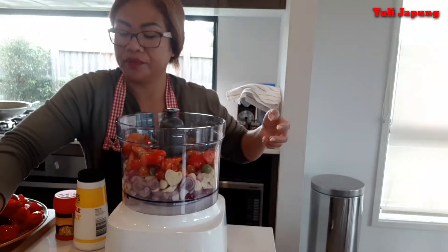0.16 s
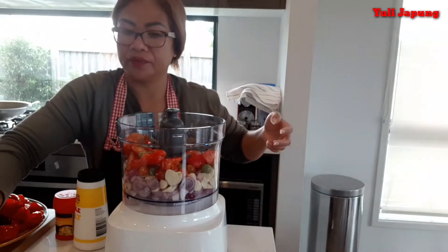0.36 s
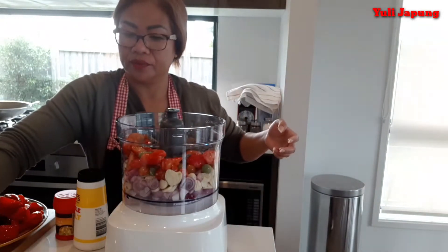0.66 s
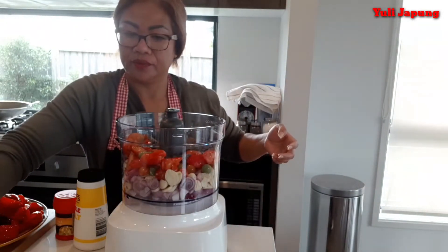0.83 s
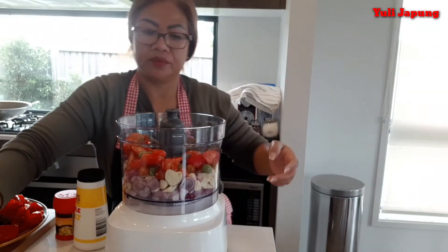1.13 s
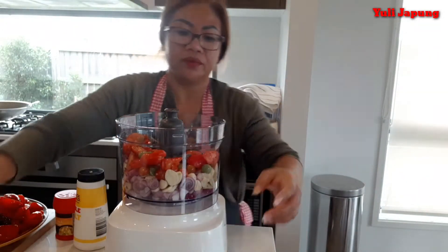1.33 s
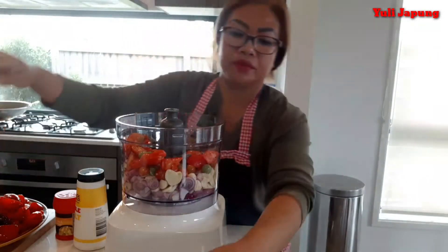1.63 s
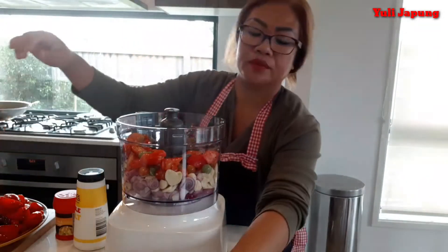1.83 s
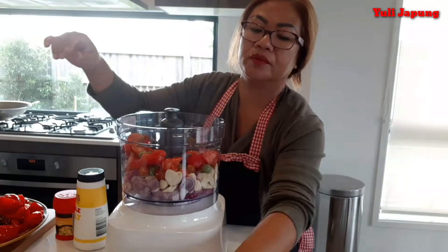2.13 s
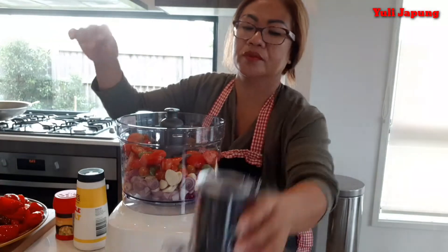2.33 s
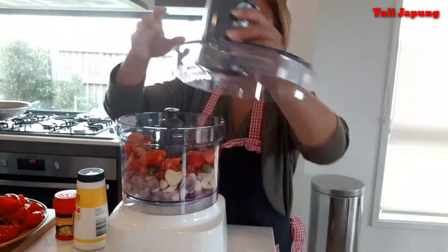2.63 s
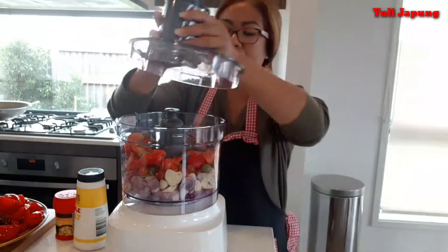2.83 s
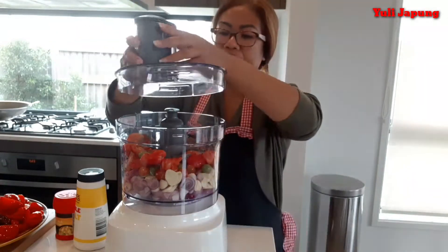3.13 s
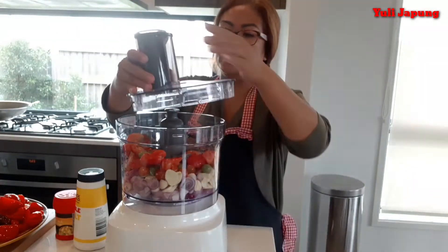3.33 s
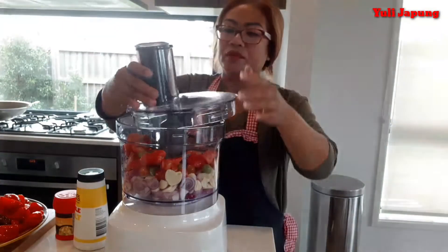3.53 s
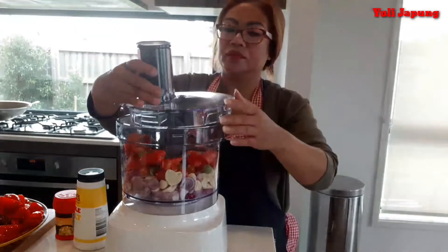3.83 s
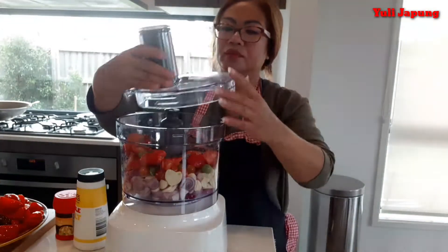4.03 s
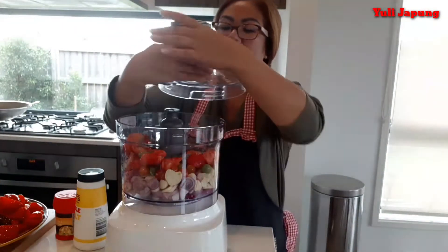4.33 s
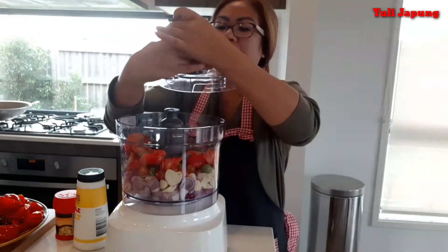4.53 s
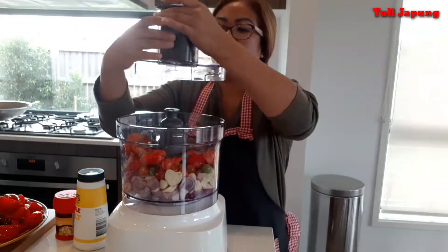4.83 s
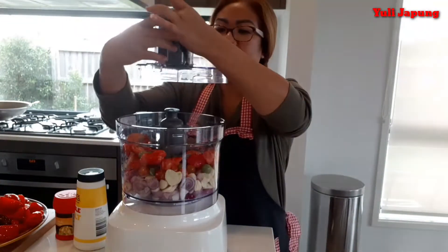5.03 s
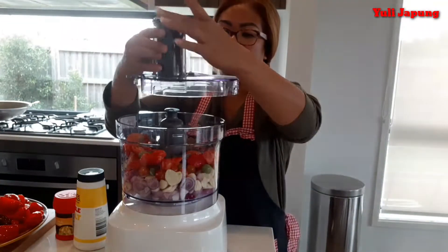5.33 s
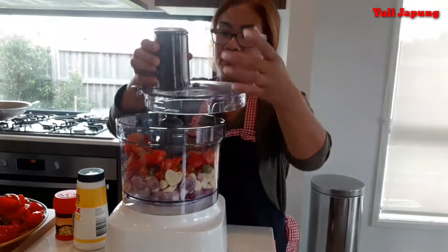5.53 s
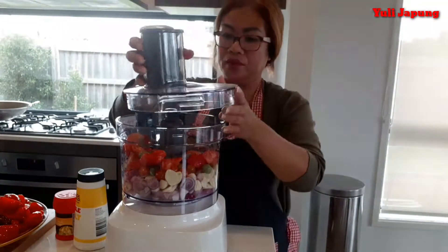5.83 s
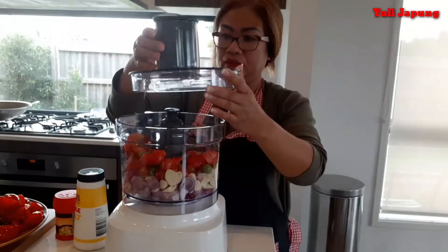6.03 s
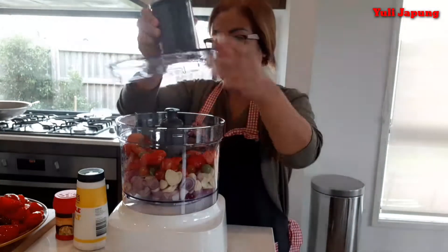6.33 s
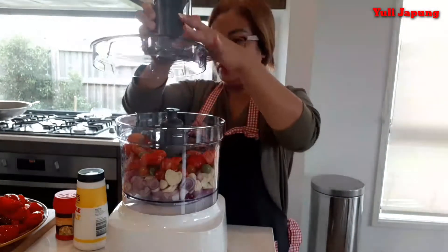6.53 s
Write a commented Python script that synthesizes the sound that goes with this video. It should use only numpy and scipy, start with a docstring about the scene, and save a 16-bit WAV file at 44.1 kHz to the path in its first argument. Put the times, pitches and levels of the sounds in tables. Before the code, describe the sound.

In a home kitchen, crockery clatters, then a plate is set down with two ringing clinks and rocks, ticking faster and fainter. A plastic food processor lid drags softly off the counter and knocks twice against the bowl. Its pusher then taps and rubs hollowly in the feed tube as the lid is turned about. The stereo microphones are close, with some room reverberation and a faint hiss.

```python
"""A home kitchen. Crockery clatters; a plate is set down with two clinks and rocks on its foot ever faster.
A plastic food processor lid is dragged off the counter and knocked onto the bowl, then its pusher
rubs and taps in the hollow feed tube as the lid is turned about. Each impact gives a broadband crack
and excites damped normal modes; sliding friction gives rough noise, which also drives the air in the tube.
Two spaced microphones receive the direct sound, the reverberation and a faint background hiss."""
import sys
import numpy as np
from scipy import signal
from scipy.fft import rfft, irfft, next_fast_len
from scipy.io import wavfile
from scipy.ndimage import uniform_filter1d

SR = 44100
rng = np.random.default_rng(int(sys.argv[2]) if len(sys.argv) > 2 else 0)


def store_wav(level_fs):
    """Save 16-bit WAV to argv[1]."""
    pcm = np.round(np.clip(np.atleast_2d(level_fs), -1, 1) * 32767)
    wavfile.write(sys.argv[1], SR, pcm.T.astype(np.int16))


N = 294588
TIME = np.arange(N) / SR
MIC_SPACING_M, SOUND_SPEED_M_PER_S, CUTOFF_HZ = .11, 343, 15800

# Levels in the tables are relative: each source applies its own gain.
# steady background: (frequency [Hz], spectral density [dB])
AIR_SPECTRUM = [(25, -9.5), (50, -7), (120, -3.5), (200, -8.5), (333, -11), (600, -18.5), (1100, -21),
                (2000, -25.5), (4000, -28), (7000, -27.5), (10000, -28), (15800, -28)]
# the hiss dips after the loud clatter, then swells back as the recorder's automatic gain recovers:
# (time [s], level [dB])
HISS_GAIN = [(0, -68.5), (.7, -71.5), (1.2, -65), (3.4, -65.5), (6.68, -62.5)]
# reverberation of the kitchen: (frequency [Hz], t60 [s])
KITCHEN_T60 = [(120, 0.48), (500, 0.54), (1200, 0.57), (4000, 0.49), (8000, 0.57), (15000, 0.24)]

# impacts: (time [s], level [dB], crack offset [dB], crack tilt [dB/octave])
DISH_IMPACTS = [(0, -8.5, 1, -1), (.018, -15, -5, -0.5), (.05, -16, -10.5, -1), (.140, -18, 3, 1.5),
                (.158, -30, 4.5, -4.5)]
COUNTER_IMPACTS = [(2.052, -27, 0, 0), (2.088, -27, 0, 0), (2.097, -23.5, 0, 0)]
BOWL_IMPACTS = [(3.571, -10, 2, 0), (3.592, -15, -1, 0.5), (3.742, -19.5, 0, -3.5)]
# the plate's clinks and their quick echoes off wall or ceiling, 8 and 23 ms later:
# (time [s], level [dB], crack offset [dB], crack tilt [dB/octave])
RIM_CLINKS_AND_ECHOES = [(.779, -18, -4.5, -0.97), (.7865, -18, 1.5, 2.1), (.8024, -24.5, 8.5, -0.37),
                         (1.0094, -40.5, -3, 0.47)]
FOOT_CLINK_AND_ECHO = [(1.1195, -8.5, 0, 0.00092), (1.1273, -19.5, 0.0048, 0)]
# the machine thumps on the counter: (time [s], level [dB])
BASE_THUMPS = [(3.578, -28), (3.749, -31.5), (1.9, -44)]
# the pusher taps the tube wall, then slides on:
# (time [s], low resonances [dB], high resonances [dB], crack [dB], slide duration [s])
TUBE_TAPS = [(2.96, -42, -69, -59, 0.052), (4.413, -45.5, -36.5, -57, 0.027),
             (4.479, -32, -37.5, -41, 0.0077), (4.503, -42, -36.5, -44.5, 0.023),
             (5.190, -46.5, -41.5, -58, 0.019), (5.233, -33, -42.5, -52.5, 0.026),
             (5.524, -47.5, -62, -67, 0.019), (5.561, -42.5, -53.5, -71, 0.055),
             (5.626, -49, -52, -80, 0.012), (5.73, -44, -52.5, -64, 0.024), (5.783, -50, -48.5, -63, 0.022),
             (5.874, -28.5, -38, -44.5, 0.025), (5.952, -40.5, -39.5, -48, 0.018),
             (6.035, -46, -34, -42, 0.0089), (6.092, -32, -38, -45.5, 0.0046),
             (6.130, -24.5, -32, -37.5, 0.0062), (6.219, -52, -68, -53.5, .005),
             (6.37, -45.5, -44, -54, 0.011), (6.559, -48.5, -55, -51, 0.031),
             (6.606, -43.5, -38, -41, 0.0049), (6.649, -47, -40.5, -47.5, 0.028)]

# normal modes of the solids and of the air in the tube: (frequency [Hz], t60 [s], level [dB])
DISH_MODES = [(1041, 0.22, -7), (1117, 0.22, -11.5), (1256, .4, -14), (1510, 0.13, -8), (1960, 0.17, -7.5),
              (2136, 0.3, -2), (3190, 0.16, -3), (4036, .22, -0.5), (4200, .25, -8.5), (5900, 0.35, -18.5),
              (6260, 0.27, -5), (7600, 0.26, -17.5), (9070, .35, -20.5), (11080, .25, -24.5)]
ROCKING_MODES = [(1292, 0.11, -13), (2540, 0.078, -8), (2720, 0.079, -3), (3270, 0.046, -17),
                 (3493, 0.027, 4), (4280, 0.027, -6.5), (4647, 0.034, -1.5), (5730, 0.02, -15),
                 (6340, 0.16, -17.5), (6820, 0.084, -18.5)]
LID_MODES = [(169, 0.077, -1.8), (468, 0.069, -0.22), (552, 0.056, -0.95), (692, 0.019, -0.98),
             (970, 0.053, 1), (1262, 0.078, 0.77), (2430, 0.051, 0), (3060, 0.037, -1.8)]
BOWL_MODES = [(299, 0.16, -16), (350, 0.11, -17.5), (474, 0.06, 1.5), (535, 0.048, 0.5), (778, 0.059, -16),
              (854, 0.057, -11.5), (1015, 0.1, -17), (1837, 0.025, -6.5), (3190, 0.015, -4),
              (3780, 0.051, -22)]
BASE_MODES = [(146.4, 0.1, 3.5), (175, 0.091, -8.5)]
TUBE_LOW_MODES = [(762.2, 0.073, -2), (830, 0.049, -9)]
TUBE_HIGH_MODES = [(998, 0.027, 2), (1022.3, 0.057, 1), (1170, 0.078, -12.5), (1273, 0.04, -4.5),
                   (1604, 0.038, -15.5), (2331, 0.033, -15.5), (3050, 0.038, -24.5), (4000, 0.038, -27.5),
                   (6740, 0.054, -22.5)]
# modes of the plate: (frequency [Hz], t60 [s], level struck at the rim [dB], level at the foot [dB])
PLATE_MODES = [(1300, 0.74, -36.5, -16), (2190, .25, -7.5, -8.5), (2440, 0.18, -3, -8.5),
               (2540, 0.42, 1.5, -8.5), (2590, 0.38, 0, -10), (2700, 0.17, -15.5, -12),
               (3190, 0.18, -44, -3.5), (3240, 0.17, -43, 3), (3470, .3, -41, -8.5), (4110, 0.22, -25, -2),
               (4300, 0.17, -1.5, -12.5), (4350, 0.13, -16.5, -4), (4410, 0.065, -29.5, 4),
               (5801, 0.29, -34, -10), (5830, 0.34, -20, -18.5), (6260, 0.2, -34.5, -10.5),
               (7270, 0.34, -22, -14.5), (7800, 0.34, -16.5, -24), (7800, 0.12, -2.5, -20),
               (8930, .28, -36.5, -16.5), (9400, 0.17, -7, -24.5), (10470, 0.3, -10, -9.5),
               (11077, 0.22, -26.5, -14), (11550, 0.26, -2, -7.5), (12950, 0.219, -45, -24.5),
               (13900, .2, -15.5, -17.5), (14050, 0.22, -30, -23), (14850, 0.18, -13.5, -22)]

# cracks, each a crowd of short-lived modes: (frequency [Hz], spectral density [dB])
DISH_SPECTRUM = [(60, -31), (150, -7), (215, -19.5), (380, -7.5), (600, -5.5), (1100, -4.5), (2400, -7.5),
                 (4200, -9.5), (4900, -18), (10000, -22.5), (15000, -27.5)]
PLATE_SPECTRUM = [(90, -26), (165, 6.5), (330, -23), (570, -2), (800, 1), (1200, 5.5), (1700, -3),
                  (2600, -2), (4400, -4.5), (6000, 2), (9000, -4), (15000, -13.5)]
COUNTER_SPECTRUM = [(90, -25), (167, -9), (370, -3), (700, -3), (1280, -3), (1710, -14.5), (2430, -6),
                    (4000, -20.5), (8000, -39), (15000, -45)]
BOWL_SPECTRUM = [(80, -15), (140, 2), (230, -26), (550, 1.5), (1100, 3.5), (2400, -2.5), (3500, 3),
                 (6000, -8), (10000, -14), (15000, -17.5)]
TUBE_SPECTRUM = [(120, -17), (330, 5), (520, 6), (1100, -4), (1800, 2.5), (2400, 4), (3600, -1),
                 (4200, 2.5), (4700, 1), (6300, 0), (8500, -18.5), (15000, -33)]

# the lid slides over the counter: (time [s], level [dB])
DRAG_ENVELOPE = [(1.6, -66), (1.7, -55), (1.75, -53), (1.83, -55), (1.92, -45.5), (2.0, -47.5), (2.13, -53),
                 (2.22, -79)]
# strokes of the scraping lid, the hands and the pusher: (start [s], duration [s], level [dB])
SCRAPE_STROKES = [(1.68, 0.1, -48.5), (2.962, 0.042, -51)]
HAND_STROKES = [(2.957, 0.057, -60.5), (5.147, 0.12, -60.5), (6.556, 0.039, -53)]
SLIDE_STROKES = [(4.413, .085, -39.5)]
# friction noise: (frequency [Hz], spectral density [dB])
DRAG_SPECTRUM = [(500, -19), (1500, -19), (3000, 0), (4500, -3), (7000, -2.5), (10000, -6.5), (13000, -18),
                 (15500, -15)]
SCRAPE_SPECTRUM = [(300, -5.5), (600, -16.5), (800, 10.5), (1250, 0), (1800, -7.5), (2300, 6), (2800, 8),
                   (3500, -38), (10000, -22)]
HAND_SPECTRUM = [(700, 0), (1800, -10.5), (2500, -8), (3500, 0.5), (4400, -5), (5400, -1), (7500, -8),
                 (10000, -13.5), (15000, -29)]
SLIDE_SPECTRUM = [(350, 2), (1200, -12), (1900, -9), (3500, 0.5), (9000, -3), (11600, 0.5), (15500, -4.5)]
SLIP_SPECTRUM = [(500, 2.5), (1300, -5.5), (2400, -2), (6000, -10.5), (12000, -24)]

ROCK_START_S, ROCK_FIRST_GAP_S, ROCK_LIMIT_GAP_S = 1.295, .04969, .02579
ROCK_GAP_KEPT = .96238   # share of its excess over the limit that a gap passes to the next
ROCK_LIMP = .04   # every other tick comes early by this share of a gap
ROCK_DB, ROCK_FADE_DB_PER_S = -38.5, 17.5
ROCK_LEAN_DB, ROCK_LEAN_DB_PER_S = 1.35, 2.5   # one side lands harder; the weight shifts to the other
SETTLE_S, SETTLE_DB_PER_S = 2.95, 12.5   # from here on the swing fades faster


def from_db(db):
    """Amplitude ratio of a level in decibels."""
    return 10 ** (np.asarray(db) / 20)


def rms_one(x):
    """Normalisation to unit mean power."""
    return x / np.sqrt(np.mean(x ** 2) + 1e-20)


def at_hz(points, hz):
    """Interpolation on a logarithmic frequency axis."""
    f, value = np.transpose(points)
    return np.interp(np.log(np.maximum(hz, 1)), np.log(f), value)


def gain_curve(rows):
    """Amplitude envelope, linear in decibels between points and silent outside its span."""
    s, db = np.transpose(rows)
    return from_db(np.interp(TIME, s, db, left=-200, right=-200))


def dying(t, t60):
    """Exponential damping: the level falls 60 dB in t60 seconds."""
    return np.exp(-np.log(1000) * t / t60)


def noise(spectrum, size, tilt_db=0):
    """Random-phase synthesis: noise of unit rms with the given spectrum, tilted by tilt_db per octave."""
    hz = np.maximum(np.fft.rfftfreq(size, 1 / SR), 1)
    bass_rolloff = np.minimum(hz / spectrum[0][0], 1) ** 2
    gain = bass_rolloff * from_db(at_hz(spectrum, hz) + tilt_db * np.log2(hz))
    return rms_one(irfft(gain * np.exp(2j * np.pi * rng.random(len(hz))), size))


def ring(hits, modes, vary_db, rise_s, wander_hz, detune=0):
    """Modal superposition: each blow excites damped sinusoids; a shifting contact makes the pitch wander."""
    hz, t60, mode_db = np.transpose(modes)[:, :, None]
    size = int(SR * np.clip(t60.max(), .1, .6))
    t, out = np.arange(size) / SR, np.zeros(N + size)
    envelope = dying(t, t60) * (1 - np.exp(-t / rise_s))
    for s, db, *_ in hits:
        strengths = from_db(db + mode_db + vary_db * rng.standard_normal(hz.shape))
        signs = rng.choice([-1, 1], hz.shape)
        wander = np.repeat(rng.standard_normal((len(hz), 140)), 200, axis=1)[:, :size]   # 4.5 ms steps
        pitch = hz * (1 + detune * rng.standard_normal()) + wander_hz * wander
        phase = 2 * np.pi * np.cumsum(pitch, axis=1) / SR
        start = round(s * SR)
        out[start:start + size] += np.sum(signs * strengths * envelope * np.sin(phase), axis=0)
    return out[:N]


def crack(hits, spectrum, t60, rise_s):
    """Modal overlap: the many short-lived modes of an impact merge into a decaying burst of noise."""
    size = SR // 4
    t, out = np.arange(size) / SR, np.zeros(N + size)
    envelope = dying(t, t60) * (1 - np.exp(-t / rise_s))
    for s, db, offset_db, tilt_db in hits:
        start = round(s * SR)
        out[start:start + size] += from_db(db + offset_db) * noise(spectrum, size, tilt_db) * envelope
    return out[:N]


def strike(hits, modes, spectrum, ring_db, crack_db, crack_t60, wander_hz):
    """Impulsive excitation: a hard blow gives a crack and a free vibration."""
    rings = ring(hits, modes, vary_db=1.96, rise_s=0.0009, wander_hz=wander_hz)
    cracks = crack(hits, spectrum, crack_t60, rise_s=0.00063)
    return from_db(ring_db) * rings + from_db(crack_db) * cracks


def strokes(rows, attack_s, sag_db_per_s, release_t60):
    """Envelope of sliding contact: each stroke grips quickly, eases off as it goes, then lets go."""
    out = np.zeros(N)
    for start, length, db in rows:
        t = TIME - start
        grip = np.clip(1 + t / attack_s, 0, 1) ** 2
        held = from_db(db - sag_db_per_s * np.clip(t, 0, length))
        out += grip * held * dying(np.clip(t - length, 0, 1), release_t60)
    return out


def rub(gain, spectrum, rough_db):
    """Sliding friction: countless tiny slips whose strength changes every few milliseconds."""
    slips = rms_one(uniform_filter1d(rng.standard_normal(N), size=130))
    return gain * rms_one(noise(spectrum, N) * from_db(rough_db * slips))


def diffuse(first, second):
    """Diffuse-field coherence: spaced microphones are alike in the bass, unrelated in the treble."""
    size = len(first)
    hz = np.fft.rfftfreq(size, 1 / SR)
    coherence = 0.77 * np.sinc(2 * hz * MIC_SPACING_M / SOUND_SPEED_M_PER_S)
    mid = irfft(rfft(first) * np.sqrt((1 + coherence) / 2), size)
    side = irfft(rfft(second) * np.sqrt((1 - coherence) / 2), size)
    return np.array([mid + side, mid - side])


def background():
    """Gain recovery, as a set curve: the hiss dips after the clatter and swells as the gain returns."""
    return gain_curve(HISS_GAIN) * diffuse(noise(AIR_SPECTRUM, N), noise(AIR_SPECTRUM, N))


def kitchen_response(early_db, early_t60, onset_s):
    """Reverberation: quick reflections off counter and cupboards, and a tail whose top treble dies first."""
    t, out = np.arange(SR) / SR, 0
    white = rfft(diffuse(*rng.standard_normal((2, SR))))
    hz = np.maximum(np.fft.rfftfreq(SR, 1 / SR), 1)
    centres = np.geomspace(125, 16000, 8)
    early = from_db(early_db) * dying(t, early_t60)
    for centre, pick in zip(centres, np.eye(len(centres))):
        band = irfft(white * np.interp(np.log(hz), np.log(centres), pick), SR)
        out = out + band * (dying(t, at_hz(KITCHEN_T60, centre)) + early)
    out = out * np.clip(t / onset_s, 0, 1)
    return out / np.sqrt(np.sum(out ** 2) / 2)


def place(x, room, wet_db, pan_db, left_lag_ms):
    """Placement: each source reaches each microphone directly and by echoes; the recorder cuts its deep bass
    below about 115 Hz."""
    x = signal.sosfilt(signal.butter(4, 115, "high", fs=SR, output="sos"), x)
    size = next_fast_len(N + SR)
    hz = np.fft.rfftfreq(size, 1 / SR)
    sides = np.array([[.5], [-.5]])   # left, right
    direct = from_db(sides * pan_db) * np.exp(-2j * np.pi * hz * sides * left_lag_ms / 1000)
    paths = direct + from_db(wet_db) * rfft(room, size)
    return irfft(rfft(x, size) * paths, size)[:, :N] / np.hypot(1, from_db(wet_db))


def crockery():
    """Free vibration: crockery rings after each blow on the worktop."""
    return strike(DISH_IMPACTS, DISH_MODES, DISH_SPECTRUM,
                  ring_db=-11.5, crack_db=0.5, crack_t60=0.051, wander_hz=35.5)


def plate_rocking():
    """Damped rocking: as its swing dies away, the plate ticks from side to side ever faster."""
    k = np.arange(68)
    gaps = ROCK_LIMIT_GAP_S + (ROCK_FIRST_GAP_S - ROCK_LIMIT_GAP_S) * ROCK_GAP_KEPT ** k
    s = ROCK_START_S + np.cumsum(gaps) - gaps * (1 + ROCK_LIMP * (k % 2))
    age = s - ROCK_START_S
    swing_db = ROCK_DB - ROCK_FADE_DB_PER_S * age - SETTLE_DB_PER_S * np.maximum(s - SETTLE_S, 0)
    lean_db = (-1) ** k * (ROCK_LEAN_DB - ROCK_LEAN_DB_PER_S * age)
    ticks = np.c_[s, swing_db + lean_db, np.zeros((len(k), 2))]
    rings = ring(ticks, ROCKING_MODES, vary_db=1.0, rise_s=0.00039, wander_hz=50.3) * from_db(6.5)
    return rings + crack(ticks, PLATE_SPECTRUM, t60=0.023, rise_s=0.0006)


def plate_set_down():
    """Point of excitation: rim and foot drive the same modes in different shares; quick echoes follow."""
    hz, t60, rim_db, foot_db = np.transpose(PLATE_MODES)
    rim = strike(RIM_CLINKS_AND_ECHOES, np.c_[hz, t60, rim_db], PLATE_SPECTRUM,
                 ring_db=-11.5, crack_db=-12, crack_t60=0.066, wander_hz=34.87)
    foot = strike(FOOT_CLINK_AND_ECHO, np.c_[hz, t60, foot_db], PLATE_SPECTRUM,
                  ring_db=-15.0, crack_db=-13.5, crack_t60=0.11, wander_hz=34.62)
    damped_t60 = t60 * .14   # most of the energy drains at once into the worktop
    rim_clank = ring(RIM_CLINKS_AND_ECHOES, np.c_[hz, damped_t60, rim_db],
                     vary_db=2.0, rise_s=0.00011, wander_hz=39.82)
    foot_clank = ring(FOOT_CLINK_AND_ECHO, np.c_[hz, damped_t60, foot_db],
                      vary_db=2.5, rise_s=0.000091, wander_hz=39.6)
    return rim + foot + from_db(-1) * rim_clank + from_db(-5) * foot_clank


def lid_lifted():
    """Friction and impact: the lid drags over the counter, scrapes hollowly and bumps as it comes free."""
    drag = rub(gain_curve(DRAG_ENVELOPE), DRAG_SPECTRUM, rough_db=2.0) * from_db(2)
    pressure = strokes(SCRAPE_STROKES, attack_s=0.034, sag_db_per_s=1, release_t60=0.21)
    scrape = rub(pressure, SCRAPE_SPECTRUM, rough_db=2.5)
    bumps = strike(COUNTER_IMPACTS, LID_MODES, COUNTER_SPECTRUM,
                   ring_db=-12.0, crack_db=-4.5, crack_t60=0.062, wander_hz=5.2)
    return drag + scrape + bumps


def lid_on_bowl():
    """Inertia: the filled bowl answers the knock of the lid at once, the heavy base slowly."""
    knocks = strike(BOWL_IMPACTS, BOWL_MODES, BOWL_SPECTRUM,
                    ring_db=-5.0, crack_db=-9.5, crack_t60=0.045, wander_hz=20)
    thumps = ring(BASE_THUMPS, BASE_MODES, vary_db=1, rise_s=0.015, wander_hz=8)
    return knocks + thumps * from_db(5.5)


def hands():
    """Friction of skin on plastic: hands shift their grip on the lid."""
    pressure = strokes(HAND_STROKES, attack_s=0.0075, sag_db_per_s=62, release_t60=0.14)
    return rub(pressure, HAND_SPECTRUM, rough_db=4.5) * from_db(6.0)


def tube_scrape(modes, tap_db, below_tap_db):
    """Forced resonance: after each tap the sliding pusher keeps the air in the tube ringing."""
    s, *_, lengths = np.transpose(TUBE_TAPS)
    response = ring([(0, 0)], modes, vary_db=0, rise_s=.001, wander_hz=0)[:SR // 4]
    slides = zip(s, lengths, tap_db - below_tap_db)   # a harder tap slides more loudly
    pressure = strokes(slides, attack_s=0.0082, sag_db_per_s=46, release_t60=0.032)
    friction = rub(pressure, SLIP_SPECTRUM, rough_db=3)
    return signal.fftconvolve(friction, response / np.linalg.norm(response))[:N]


def pusher_in_tube():
    """Air-column resonance: the pusher taps and slides; the tube rings a little differently at each depth."""
    s, low_db, high_db, crack_db, _ = np.transpose(TUBE_TAPS)
    low = ring(zip(s, low_db), TUBE_LOW_MODES, vary_db=2.5, rise_s=0.0028, wander_hz=25.7, detune=0.0068)
    high = ring(zip(s, high_db), TUBE_HIGH_MODES, vary_db=2.5, rise_s=0.006, wander_hz=35.5, detune=0.031)
    contacts = [(at, db, 0, 0) for at, db in zip(s, crack_db)]
    scuffs = crack(contacts, TUBE_SPECTRUM, t60=0.057, rise_s=0.002)
    taps = low * from_db(1.5) + high * from_db(3.5) + scuffs * from_db(3)
    pressure = strokes(SLIDE_STROKES, attack_s=0.0068, sag_db_per_s=135, release_t60=0.24)
    slide = rub(pressure, SLIDE_SPECTRUM, rough_db=2.5)
    return (taps + slide + hands()
            + tube_scrape(TUBE_LOW_MODES, low_db, below_tap_db=18.5)
            + tube_scrape(TUBE_HIGH_MODES, high_db, below_tap_db=15))


def scene():
    """Superposition in one room: crockery stands off to the side, the processor close in front."""
    room = kitchen_response(early_db=-1.5, early_t60=0.1, onset_s=0.0021)
    return (background()
            + place(plate_set_down(), room, wet_db=.5, pan_db=.3, left_lag_ms=.16)
            + place(plate_rocking(), room, wet_db=-1, pan_db=-.3, left_lag_ms=.03)
            + place(crockery(), room, wet_db=3, pan_db=3.5, left_lag_ms=0.17)
            + place(lid_lifted(), room, wet_db=-2.5, pan_db=-0.5, left_lag_ms=0.077)
            + place(lid_on_bowl(), room, wet_db=0.5, pan_db=-0.5, left_lag_ms=0.038)
            + place(pusher_in_tube(), room, wet_db=1.0, pan_db=1.5, left_lag_ms=0))


def record(dry):
    """Band limiting: an elliptic low-pass filter cuts the top steeply."""
    return signal.sosfilt(signal.ellip(10, .1, 80, CUTOFF_HZ, fs=SR, output="sos"), dry)


dry = scene()
out = record(dry)
store_wav(out)
```